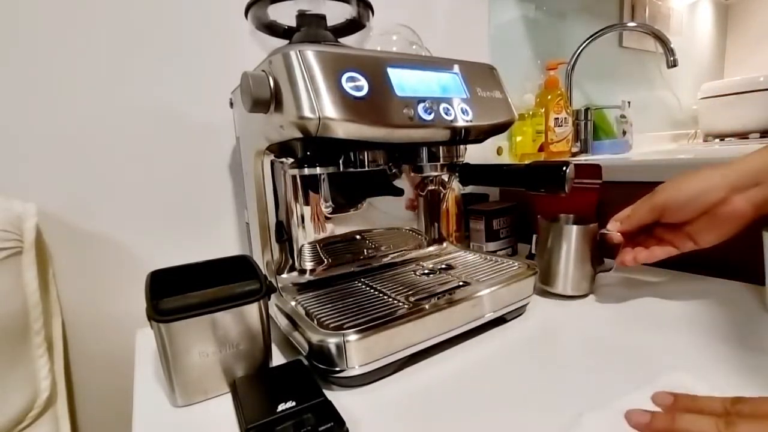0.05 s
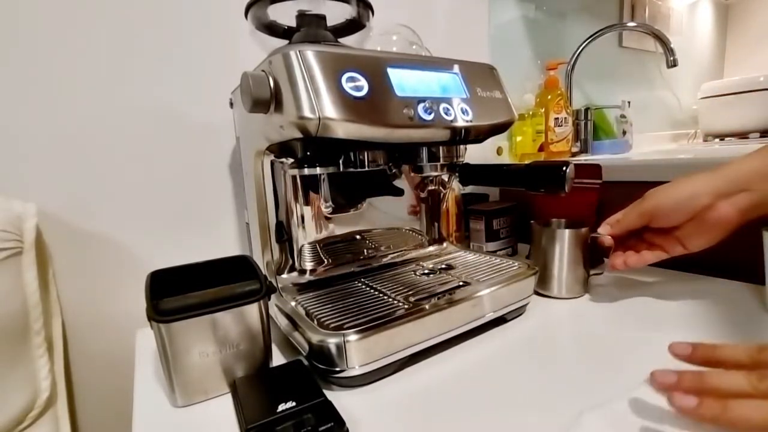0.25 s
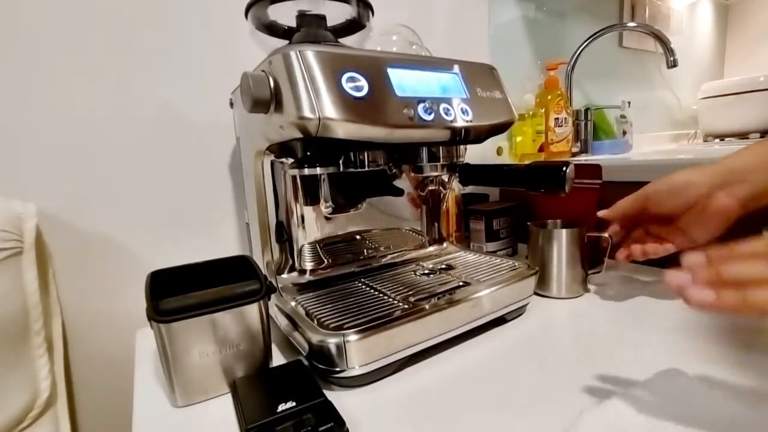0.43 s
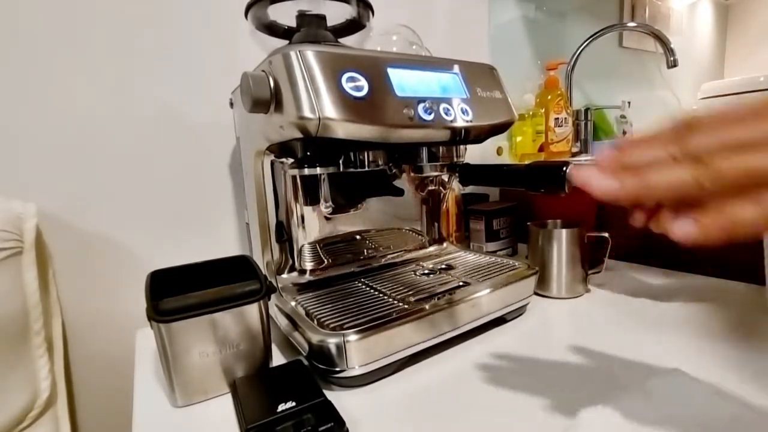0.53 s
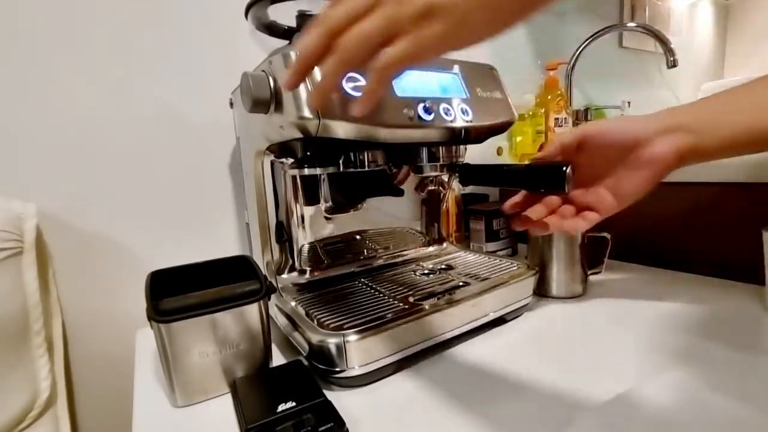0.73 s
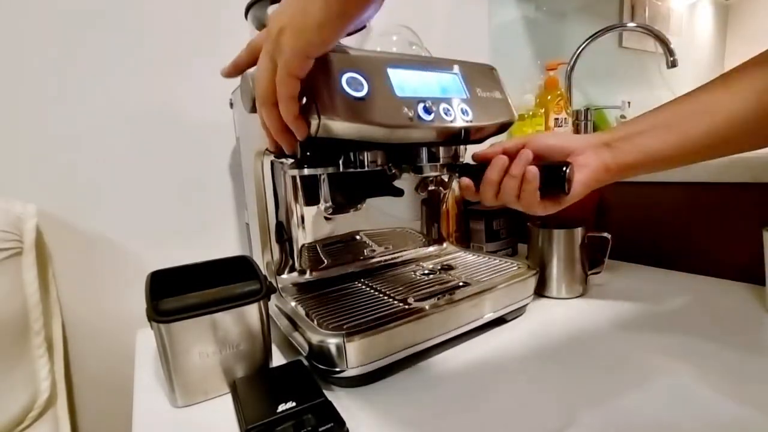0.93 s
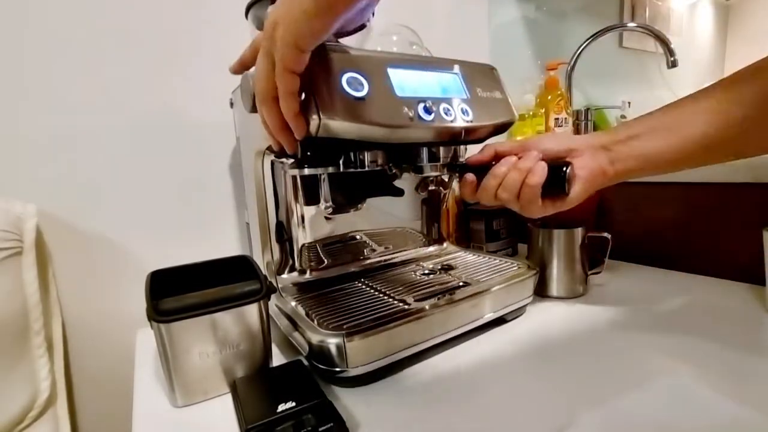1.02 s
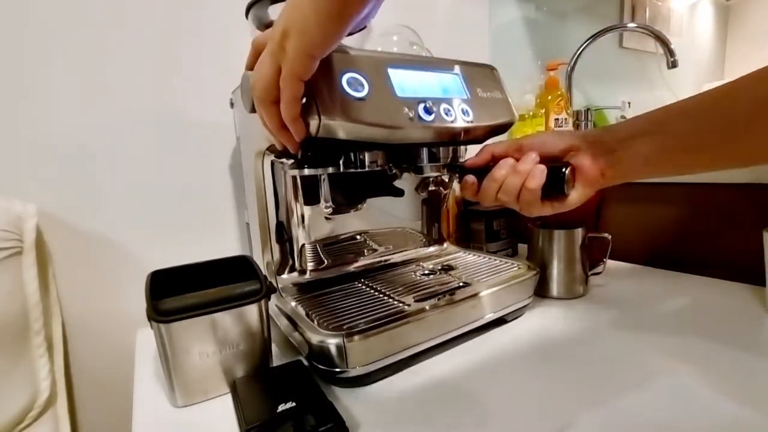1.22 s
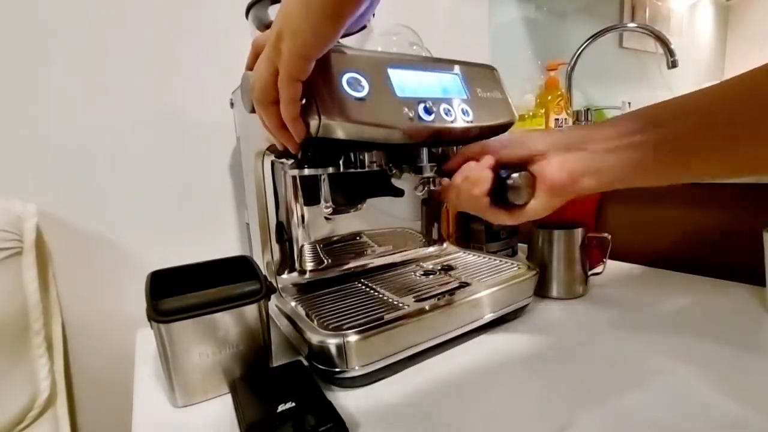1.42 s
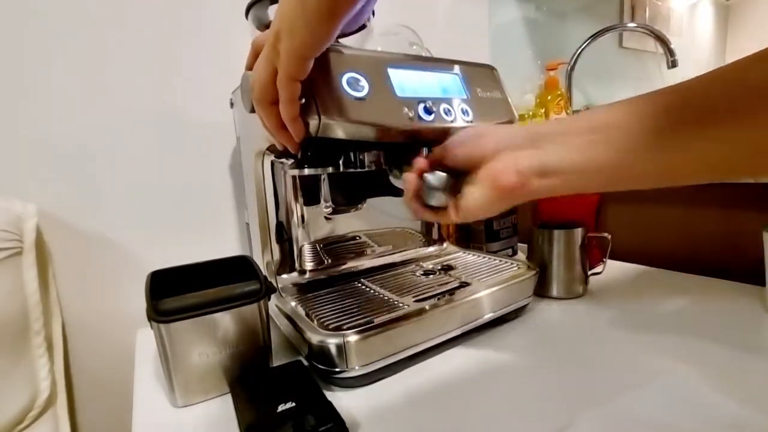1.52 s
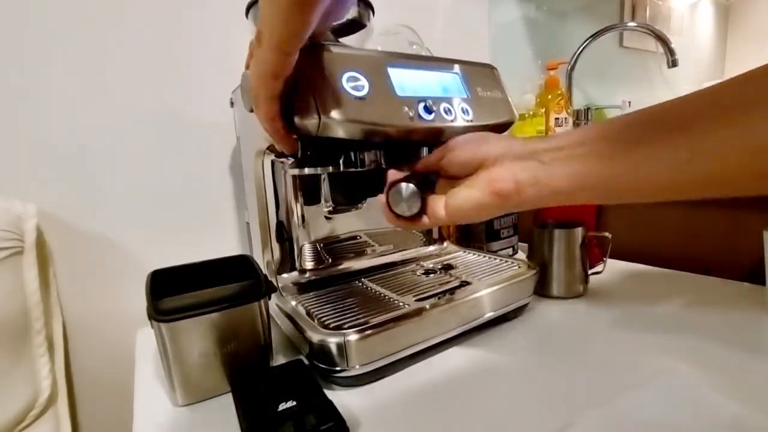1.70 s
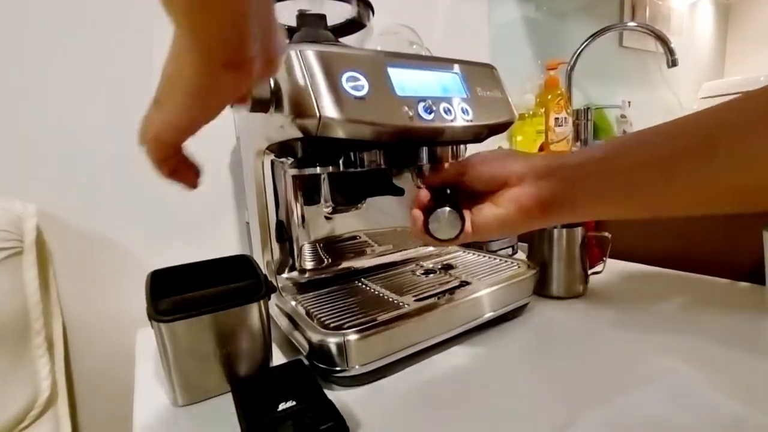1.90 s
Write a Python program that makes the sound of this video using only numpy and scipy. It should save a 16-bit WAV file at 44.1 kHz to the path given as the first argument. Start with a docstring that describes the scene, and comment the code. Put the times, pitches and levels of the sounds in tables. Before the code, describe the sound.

Metal jug set down, followed by a coffee machine handle twisting free with a clunk.

```python
"""A steel milk pitcher lands on a kitchen counter, right of centre: its base thuds and its wall rings.
Hands take hold of an espresso machine with small taps and soft rubs. The portafilter (the coffee
holder) is twisted against its gasket, breaks loose with a clunk and rattles in its socket,
shaking the housing. A small, quiet kitchen echoes the knocks and taps."""
import sys
import numpy as np
from scipy import signal
from scipy.fft import rfft, irfft
from scipy.io import wavfile
from scipy.ndimage import uniform_filter1d

SR = 44100
rng = np.random.default_rng(int(sys.argv[2]) if len(sys.argv) > 2 else 0)


def wav_out(sig):
    """Save sig, one row per channel (or a flat mono array), as 16-bit PCM at SR to the path in sys.argv[1]."""
    wavfile.write(sys.argv[1], SR, np.round(np.clip(np.atleast_2d(sig).T, -1, 1) * 32767).astype(np.int16))


N = 85995

TIME = np.arange(N) / SR
FREQS = np.maximum(np.arange(N + 1) * SR / (2 * N), 1)


def from_db(db):
    """Turn decibels into a gain."""
    return 10 ** (np.asarray(db) / 20)


def at_hz(points, hz):
    """Read between a table's rows on a log-frequency axis."""
    f, value = np.transpose(points)
    return np.interp(np.log(hz), np.log(f), value)


def filtered(x, response):
    """Scale and delay each frequency of a sound."""
    return irfft(rfft(x, 2 * N) * response)[..., :N]


def colour(x, spectrum):
    """Give a sound a tone colour; white noise keeps its overall level."""
    gain = from_db(at_hz(spectrum, FREQS))
    cepstrum = irfft(np.log(gain / np.sqrt(np.mean(gain ** 2))))
    # Fold the filter so that nothing sounds before the hit.
    cepstrum[1:N] *= 2
    cepstrum[N + 1:] = 0
    return filtered(x, np.exp(rfft(cepstrum)))


# How alike the two ears' noise is. Each row: frequency in Hz, likeness (1 is identical).
LIKENESS = [(60, 0.37), (180, 0.87), (400, 0.34), (900, 0.035), (16000, 0.05)]
def noise():
    """White stereo noise, alike in the bass and almost unrelated in the treble."""
    mid, side = rng.standard_normal((2, N))
    alike = at_hz(LIKENESS, FREQS)
    shared = filtered(mid, np.sqrt((1 + alike) / 2))
    return shared + filtered(side, np.sqrt((1 - alike) / 2)) * [[1], [-1]]


def decay(start, fade_s, rise_s=0.00057):
    """Rise quickly, then die away. A fade time is how long it takes to drop 60 dB."""
    age = np.maximum(TIME - start, 0)
    return np.minimum(age / rise_s, 1) * np.exp(-np.log(1000) * age / fade_s)


def bursts(rows, spectrum):
    """Each hit makes a short burst of coloured noise."""
    return colour(noise() * sum(from_db(db) * decay(start, fade) for start, db, fade in rows), spectrum)


def tones(rows, rise_s):
    """Each row makes one fading tone."""
    return sum(from_db(db) * decay(start, fade, rise_s) * np.sin(2 * np.pi * hz * (TIME - start))
               for start, hz, db, fade in rows)


def ring(blows, modes, alternate=True):
    """Each blow rings an object's own tones (modes); alternating their signs softens the punch."""
    body = sum((-1) ** (k * alternate) * from_db(db) * decay(0, fade) * np.sin(2 * np.pi * hz * TIME)
               for k, (hz, db, fade) in enumerate(modes))
    return filtered(body, sum(from_db(db) * np.exp(-2j * np.pi * FREQS * start) for start, db in blows))


def place(x, pan_db, lead_ms=0):
    """Make the left side louder by pan_db and earlier by lead_ms; negative favours the right."""
    side = np.array([[.5], [-.5]])
    lead_s = lead_ms / 1000
    return filtered(x, from_db(side * pan_db) * np.exp(2j * np.pi * FREQS * side * lead_s))


def grain(depth_db, size):
    """A random flicker in level, smoothed over size samples, that makes a sound rough."""
    rough = uniform_filter1d(rng.standard_normal(N), size) * np.sqrt(size)
    return from_db(depth_db * rough)


# The quiet kitchen's colour. Each row: frequency in Hz, relative level in dB.
QUIET_COLOUR = [(25, -5), (65, 3), (110, -8.5), (220, -12), (400, -8.5), (650, -21), (1300, -21),
                (2200, -32.5), (3200, -30), (6000, -42.5), (10000, -44), (16000, -38.5)]
def quiet_kitchen():
    """A faint, low, steady noise fills the room."""
    return from_db(-67.5) * colour(noise(), QUIET_COLOUR)


# The base meets the counter. Each row: start in seconds, strength in dB.
PITCHER_CONTACTS = [(0.2167, 2), (0.2231, -9)]
# Tones of pitcher and counter together. Each row: pitch in Hz, relative level in dB, fade in seconds.
THUD_MODES = [(136.6, -27.5, 0.11), (251.6, -26, 0.036), (352.5, -16, 0.061), (442.6, -23, .06),
              (505.6, -20.5, 0.11), (688, -18, 0.08), (784, -27.5, .06), (1041, -28, 0.066),
              (1075, -22, 0.074), (1337, -32.5, .05), (1684, -27, 0.028)]
# The crack of steel on stone. Each row: frequency in Hz, relative level in dB.
CRACK_COLOUR = [(50, -17), (150, -1.5), (600, 5.5), (1500, -2.5), (2200, -14), (4500, -27.5), (7000, -32),
                (10500, -48), (12500, -38.5), (16000, -47)]
def pitcher_landing():
    """The base lands in two quick contacts, each with a crack and a thud."""
    crack_db, fade_s = -16.5, 0.039
    crack = bursts([(start, crack_db + db, fade_s) for start, db in PITCHER_CONTACTS], CRACK_COLOUR)
    thud = ring(PITCHER_CONTACTS, THUD_MODES)
    return place(thud + crack, pan_db=-3.5, lead_ms=-0.445)


# The steel wall's tones. Each row: pitch in Hz, relative level in dB, fade in seconds.
WALL_MODES = [(1104, 3, .22), (1308, 1, .23), (2326, -3, .16), (2642, -7, .16), (3273, -1, .28),
              (4199, -6, .16), (4845, -5, .14), (6298, -7, .14), (6395, -9, .18), (6885, -9, .13),
              (7004, -10, .18), (8818, -13, .17), (8940, -18, .17), (9958, -24, .2), (12150, -21, .17),
              (12850, -19, .17), (14900, -22, .15)]
def pitcher_wall():
    """The wall rings on; each tone beats against a close twin, differently in each ear."""
    start, strength_db = PITCHER_CONTACTS[0][0], -48
    sides = []
    for gaps_hz in 23 * rng.uniform(-2.5, 1.5, (2, len(WALL_MODES))):
        twins = [(hz + gap, db - 0.5, fade) for (hz, db, fade), gap in zip(WALL_MODES, gaps_hz)]
        sides.append(ring([(start, strength_db)], WALL_MODES + twins))
    return np.array(sides)


# How long the echo lasts. Each row: frequency in Hz, fade in seconds.
ECHO_FADES = [(100, 0.29), (300, 0.32), (1000, 0.22), (4000, 0.3), (14000, 0.11)]
# The echo's colour. Each row: frequency in Hz, relative level in dB.
ECHO_COLOUR = [(60, -7), (200, -6), (500, -7.5), (1300, -12), (3000, -2), (7000, -15.5), (16000, -0.5)]
def kitchen_echo(x):
    """Reflections build up quickly, and each octave dies away at its own pace."""
    delay_s, build_s, lowest_hz = 0.0036, 0.0042, 62.5
    white, tail = rfft(noise(), 2 * N), 0
    octave = np.clip(np.log2(FREQS / lowest_hz), 0, 8)
    for k in range(9):
        hz = lowest_hz * 2 ** k
        fade = at_hz(ECHO_FADES, hz)
        band = irfft(white * np.maximum(1 - abs(octave - k), 0))[:, :N]
        even_energy = np.sqrt(2 * np.log(1000) / (fade * SR))
        tail = tail + band * decay(delay_s, fade) * from_db(at_hz(ECHO_COLOUR, hz)) * even_energy
    build_up = np.clip((TIME - delay_s) / build_s, 0, 1)
    return filtered(x, rfft(tail * build_up, 2 * N))


# Deep, faint wobbles. Each row: start in seconds, pitch in Hz, level in dB, fade in seconds.
WOBBLES = [(0.26, 98.5, -49.5, 0.52), (0.46, 137, -50.5, 0.22), (0.595, 67.1, -61, 1),
           (0.96, 62.6, -51.5, 0.55), (1.195, 147.8, -51.5, 0.19), (1.21, 65.4, -52, 0.47),
           (1.665, 60, -46, 0.36)]
def counter_wobbles():
    """Counter and machine wobble as the hands let go and push."""
    return place(tones(WOBBLES, rise_s=0.017), pan_db=-5)


# Small contacts. Each row: start in seconds, thump, knock and tick levels in dB, fade in seconds.
TAPS = [(0.375, -47.5, -78, -78, 0.057), (0.4036, -42.5, -52, -61.5, 0.032), (0.723, -91, -66.5, -77, 0.15),
        (0.7798, -63, -45, -46, .025), (0.907, -75, -55.5, -69.5, 0.076), (0.944, -57.5, -62.5, -67, 0.065),
        (1.073, -58.5, -49.5, -66.5, 0.054), (1.1237, -49, -42, -41.5, 0.035),
        (1.173, -73, -55, -71, 0.037), (1.184, -57, -48.5, -83, 0.069), (1.195, -52, -65, -89, 0.082),
        (1.228, -56, -62, -66.5, 0.045), (1.247, -47.5, -47.5, -83, 0.059),
        (1.2843, -51.5, -58, -45.5, 0.024), (1.419, -69, -62, -59.5, 0.062), (1.7265, -74, -48, -68, .03),
        (1.84, -62, -68, -89, .05), (1.869, -49, -62, -98, 0.028), (1.925, -58, -54, -82, 0.052)]
# The colours of a tap's three parts. Each row: frequency in Hz, relative level in dB.
THUMP_COLOUR = [(40, -11.5), (140, -1.5), (350, -4.5), (700, -19), (2000, -73.5)]
KNOCK_COLOUR = [(150, -12), (400, 5), (650, 5.5), (1350, -0.5), (2100, -8.5), (3000, -33), (8000, -42),
                (16000, -60)]
TICK_COLOUR = [(700, -10.5), (2000, 6.5), (2600, 3), (3500, 7), (6000, -4), (9500, -12.5), (16000, -26)]
def taps():
    """Fingers and loose parts tap, each a blend of soft thump, hollow knock and hard tick."""
    starts, thump_db, knock_db, tick_db, fades = np.transpose(TAPS)
    parts = (thump_db, THUMP_COLOUR), (knock_db, KNOCK_COLOUR), (tick_db, TICK_COLOUR)
    return sum(bursts(zip(starts, levels, fades), spectrum) for levels, spectrum in parts)


# Small pings. Each row: start in seconds, pitch in Hz, level in dB, fade in seconds.
PINGS = [(0.404, 4180, -65, .05), (0.724, 1690, -68, 0.089), (0.780, 1108, -43, 0.029),
         (0.915, 553, -49.5, 0.071), (0.945, 1885, -59, 0.038), (1.075, 1364, -50, 0.047),
         (1.249, 725, -49.5, 0.041), (1.286, 2060, -57, 0.032), (1.287, 3460, -79, 0.27),
         (1.588, 1750, -25, 0.025), (1.588, 3450, -38, 0.036), (1.662, 990, -28.5, 0.047),
         (1.838, 848, -50, 0.056), (1.926, 856, -47, .09)]
def loose_pings():
    """Small loose parts ring briefly with a rough tone."""
    return tones(PINGS, rise_s=0.0024) * grain(depth_db=3, size=200)


# Sliding strokes. Each row: start and length in seconds, swish and hiss levels in dB.
RUBS = [(0.6, 0.038, -76, -90), (0.774, 0.051, -56.5, -69), (0.932, 0.099, -75, -63.5),
        (1.1, 0.064, -59, -76.5), (1.358, 0.26, -72, -82), (1.652, 0.12, -69.5, -76.5),
        (1.865, .015, -85, -84)]
# The colours of a rub's two parts. Each row: frequency in Hz, relative level in dB.
SWISH_COLOUR = [(100, -13), (500, 3), (1000, 2.5), (2000, -3), (4000, -5.5), (7000, -18), (16000, -37)]
HISS_COLOUR = [(1000, -6.5), (3500, -2), (6000, 2.5), (9500, -2), (13000, 2.5), (16000, -2)]
def rubs():
    """Skin and cloth slide over steel; each stroke swells, holds and fades."""
    attack_s, release_s = 0.039, 0.057
    swish, hiss = 0, 0
    for start, length, swish_db, hiss_db in RUBS:
        swell = np.clip((TIME - start) / attack_s + .5, 0, 1)
        stroke = swell * np.exp(-2 * np.maximum(TIME - start - length, 0) / release_s)
        swish += from_db(swish_db) * stroke
        hiss += from_db(hiss_db) * stroke
    rough_swish = noise() * swish * grain(depth_db=1, size=120)
    return colour(rough_swish, SWISH_COLOUR) + colour(noise() * hiss, HISS_COLOUR)


# The handle's snick. Each row: start in seconds, level in dB, fade in seconds.
SNICKS = [(1.2855, -49, 0.036)]
# Its colour. Each row: frequency in Hz, relative level in dB.
SNICK_COLOUR = [(1500, -35), (3500, -2), (6000, 3.5), (8000, -7.5), (10000, -13.5), (13000, -10),
                (16000, -15)]
def handle_snick():
    """The handle's steel gives one sharp, bright click."""
    return bursts(SNICKS, SNICK_COLOUR)


# How loudly the gasket drags. Each row: time in seconds, level in dB.
DRAG_LEVELS = [(1.348, -67.5), (1.459, -56), (1.538, -68.5), (1.598, -31), (1.68, -45.5), (1.75, -46),
               (1.80, -63.5), (1.87, -57.5), (1.95, -58.5)]
# The groan's colour. Each row: frequency in Hz, relative level in dB.
GROAN_COLOUR = [(50, -4), (160, -4), (230, 3), (380, 4.5), (560, 4), (800, -9.5), (1500, -19.5),
                (4000, -62)]
def gasket_groan():
    """The gasket drags with a low, uneven groan as the handle turns."""
    times, levels = np.transpose(DRAG_LEVELS)
    drag = (TIME > times[0]) * from_db(np.interp(TIME, times, levels))
    return colour(noise() * drag * grain(depth_db=2, size=300), GROAN_COLOUR)


# The portafilter knocks in its socket.
# Each row: start in seconds, blow to the housing in dB, clack level in dB, clack fade in seconds.
KNOCKS = [(1.5622, -33, -45, 0.24), (1.5822, -15, -25, 0.09), (1.5886, 0, -26.5, 0.031),
          (1.6197, -15, -44, 0.035), (1.629, -18, -35.5, 0.034), (1.6613, -7.5, -35, 0.086),
          (1.7020, -30, -49, .04), (1.7285, -18, -38.5, 0.044), (1.756, -25.5, -60, 0.036),
          (1.818, -35, -68, 0.021), (1.851, -29, -72, 0.016), (1.8698, -25.5, -70, 0.012),
          (1.898, -30, -77, 0.026), (1.926, -30.5, -81, .03)]
# The clack's colour. Each row: frequency in Hz, relative level in dB.
CLACK_COLOUR = [(50, -14.5), (200, 0.5), (600, 4.5), (1200, -10), (2200, -15), (3400, -19.5), (6300, -25),
                (9500, -39), (16000, -40.5)]
def lug_clacks():
    """The lugs (the portafilter's locking tabs) clack; lighter contacts sound duller."""
    brightest_hz, softening = 17000, .75
    hardest_db = max(db for _, _, db, _ in KNOCKS)
    white, clacks = noise(), 0
    for start, _, db, fade in KNOCKS:
        cutoff_hz = np.clip(brightest_hz * from_db(softening * (db - hardest_db)), 1500, .45 * SR)
        dulled = signal.sosfilt(signal.butter(2, cutoff_hz, fs=SR, output="sos"), white)
        clacks += dulled * from_db(db) * decay(start, fade)
    return colour(clacks, CLACK_COLOUR)


# The machine housing's tones. Each row: pitch in Hz, relative level in dB, fade in seconds.
HOUSING_MODES = [(135, -34, 0.21), (230.9, -25, 0.21), (270, -25, 0.055), (332, -13.5, 0.032),
                 (380.7, -20.5, 0.052), (502, -22.5, 0.1), (581, -29, 0.078), (676.5, -34.5, 0.084),
                 (879, -32, 0.047), (1010, -29.5, 0.041), (1583, -43, 0.033)]
def housing_clunk():
    """The same knocks shake the housing, which gives off little sound below 140 Hz."""
    body = ring([(start, db) for start, db, _, _ in KNOCKS], HOUSING_MODES, alternate=False)
    return signal.sosfilt(signal.butter(2, 140, "high", fs=SR, output="sos"), body)


def scene():
    """Mix the pitcher, the hands and the portafilter with the kitchen around them."""
    landing = pitcher_landing()
    portafilter = place(lug_clacks() + housing_clunk() + gasket_groan(), pan_db=-2.5, lead_ms=0.352)
    handling = place(taps() + handle_snick() + loose_pings(), pan_db=-2.5, lead_ms=0.12)
    echo = kitchen_echo(from_db(1) * (landing + handling) + portafilter)
    direct = landing + pitcher_wall() + counter_wobbles() + handling + rubs() + portafilter
    return direct + echo + quiet_kitchen()


def record(dry):
    """Roll off the bass below 35 Hz and cut the treble steeply above 16000 Hz."""
    dry = signal.sosfilt(signal.butter(2, 35, "high", fs=SR, output="sos"), dry)
    return signal.sosfilt(signal.ellip(10, .2, 70, 16000, fs=SR, output="sos"), dry)


dry = scene()
out = record(dry)
wav_out(out)
```